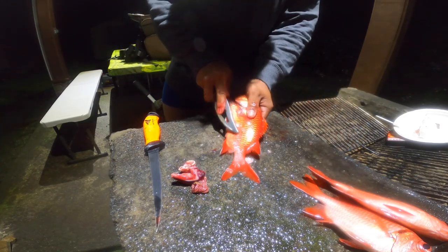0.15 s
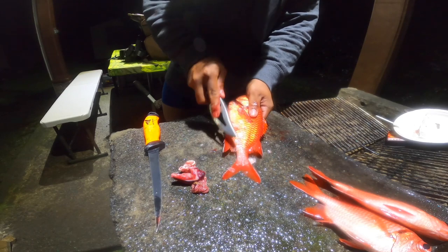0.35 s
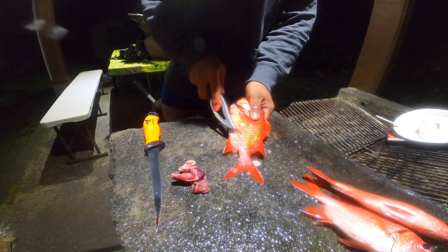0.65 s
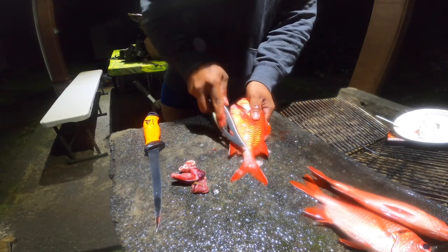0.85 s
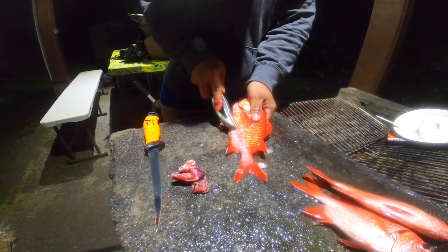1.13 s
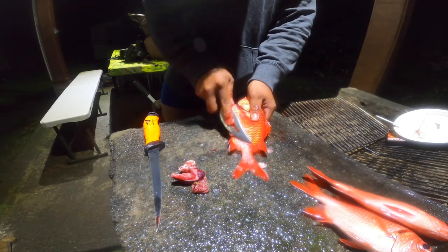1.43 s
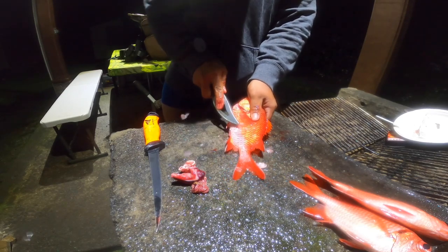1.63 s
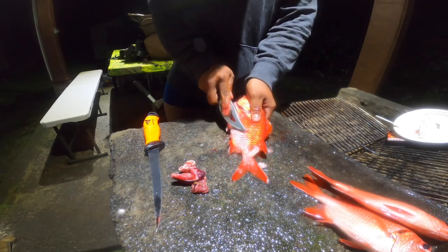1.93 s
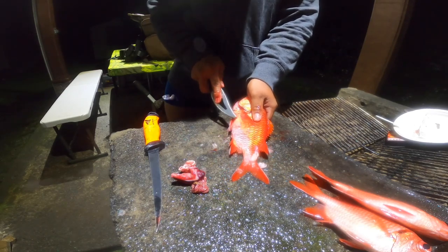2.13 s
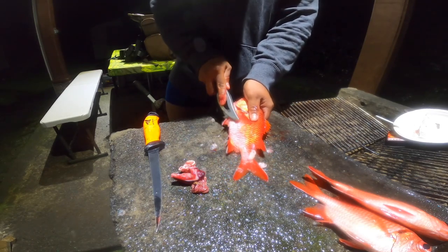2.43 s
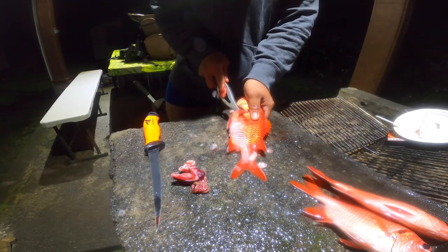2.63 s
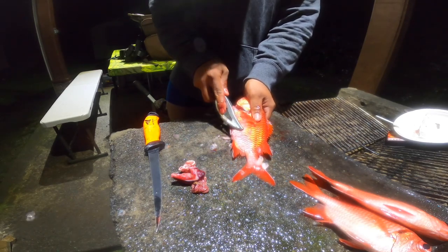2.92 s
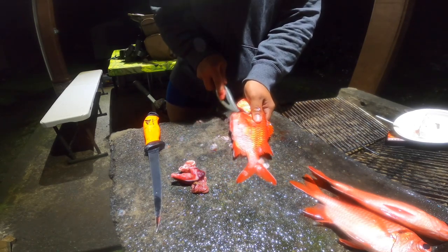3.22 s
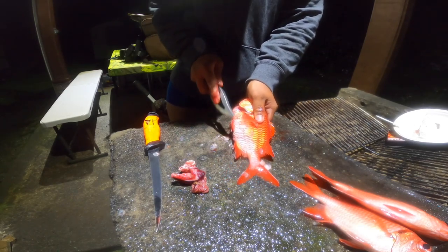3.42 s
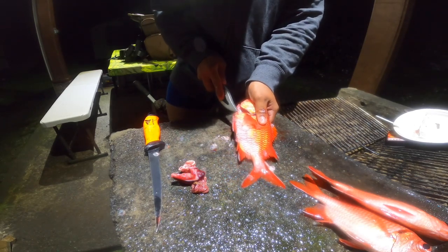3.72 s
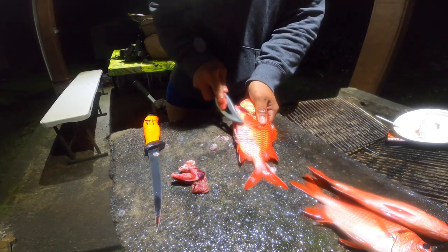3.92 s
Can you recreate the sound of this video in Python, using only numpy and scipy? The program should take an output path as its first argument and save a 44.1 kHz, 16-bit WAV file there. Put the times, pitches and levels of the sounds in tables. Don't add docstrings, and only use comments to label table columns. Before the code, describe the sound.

Close stereo sound of a fish being scaled on a stone slab under an open shelter at night. Rasping strokes come at about 0.15, 0.6, 1.1, 1.55, 2.0 and 2.5 seconds, each lasting about 0.15 to 0.2 seconds. Every stroke is a gritty scrape full of bright, sharp cracks, with the blade singing briefly around a high metallic pitch and a soft damped body beneath. Quick light drags follow at about 0.8 and 2.75. From 3.1 the strokes turn shorter and more broken, fading into light scrapes by 4.0. Loose scales tick between passes, and dull little knocks mark the edge bumping. Distant frogs give faint gliding whistles, clearer near 2.9, 3.4 and 3.8, over a soft insect and frog hiss. Low wind rumble stirs around 1.5 and swells most from 3.3 onward. The shelter adds only a very short, faint reflection.

```python
import sys
import numpy as np
from scipy import signal
from scipy.fft import rfft, irfft, next_fast_len
from scipy.io import wavfile
from scipy.ndimage import map_coordinates

SR = 44100
rng = np.random.default_rng(int(sys.argv[2]) if len(sys.argv) > 2 else 0)


def voltage_ratio(level):
    return 10 ** (np.asarray(level, float) / 20)


def inscribe(sig):
    pcm = np.round(np.clip(np.atleast_2d(sig).T, -1, 1) * 32767)
    wavfile.write(sys.argv[1], SR, pcm.astype(np.int16))


N = 179237

# start t/s, length t/s, rasp level/dB, blade level/dB at the start, at the end
STROKES = [(0.16, .15, -33.5, -33.5, -30), (0.61, 0.14, -29, -27, -32), (0.807, 0.011, -38, -46, -31),
           (1.074, 0.15, -31.5, -26, -34.5), (1.539, 0.16, -30.5, -23, -29), (1.758, 0.079, -48, -64, -54),
           (2.012, 0.2, -27.5, -27.5, -30.5), (2.473, 0.2, -30.5, -29, -42.5),
           (2.711, 0.061, -35, -33.5, -31.5), (2.789, 0.067, -45.5, -91, -42),
           (3.109, 0.1, -37, -36.5, -43), (3.272, 0.084, -34.5, -40, -34.5),
           (3.387, 0.064, -51.5, -54, -50), (3.673, 0.059, -37.5, -35.5, -33.5),
           (3.8, 0.045, -43.5, -43, -42.5), (4.026, 0.023, -47.5, -52, -50.5)]
LEAD_INS = [
    (.138, .02, -62, -53, -53),
    (.54, 0.052, -63, -73, -29),
    (1.0, 0.055, -51.5, -74, -44.5),
    (1.25, 0.088, -54.5, -69, -53),
    (2.412, 0.036, -47, -75, -48),
    (3.0, 0.067, -48, -63, -60),
    (3.59, 0.061, -51, -59, -49),
]


def knife():
    edge_db, first_db, last_db = np.transpose(STROKES + LEAD_INS)[2:]
    rasp_db = passes(edge_db - 4, edge_db, rise=0.031, fall=0.048, rest_db=-64)
    blade_db = passes(first_db, last_db, rise=0.027, fall=0.038, rest_db=-70.5)
    flesh_start_db = (edge_db + first_db) / 2 - 8 - 4.5
    flesh_end_db = (edge_db + last_db) / 2 - 8
    flesh_db = passes(flesh_start_db, flesh_end_db, rise=0.014, fall=0.049, rest_db=-72.5)
    major, minor = scales(rasp_db)
    cracks = snaps(major + TICKS + minor)
    scrape = knocks() + rasp(rasp_db) + blade(blade_db, major) + flesh(flesh_db)
    return cracks, scrape


def passes(start_db, end_db, rise, fall, rest_db):
    t, power = np.arange(N) / SR, voltage_ratio(2 * rest_db)
    for (s, length, *_), a, b in zip(STROKES + LEAD_INS, start_db, end_db):
        held = a + (b - a) * np.clip((t - s) / length, 0, 1)
        before, after = np.maximum(s - t, 0), np.maximum(t - s - length, 0)
        power = power + voltage_ratio(2 * (held - 20 * before / rise - 20 * after / fall))
    return 10 * np.log10(power)


def chatter(share, spread_db, row_db):
    slips = (rng.random(N) < share) * rng.standard_normal(N)
    slips = slips * voltage_ratio(spread_db * rng.standard_normal(N))
    return unit(slips * voltage_ratio(row_db * np.tanh(wobble(130))))


# f/Hz, bandwidth f/Hz, level/dB
EDGE = [(2270, 840, -9.5), (3400, 560, 3.5), (4250, 1180, 0.5), (5580, 860, 1.5), (9010, 800, -7.5),
        (11900, 2100, -20), (14800, 4800, -33)]


def rasp(level_db):
    slips = chatter(0.12, 4, 6.5) + 0.45 * rng.standard_normal(N)
    return voltage_ratio(level_db - 1.0) * unit(filtered(slips, modes(EDGE)))


# t/s, f/Hz
BEND = [(.2, 1840), (.68, 1830), (.82, 1880), (1.1, 1863), (1.25, 1875), (1.55, 1870), (2.0, 1859),
        (2.2, 1893), (2.5, 1873), (2.76, 1970), (3.1, 1906), (3.75, 1896), (3.85, 1920)]
# t/s, level/dB
CATCHES = [(.196, -16.5), (0.22, -15.5), (0.2283, -11.5), (0.264, -15.5), (0.6512, -13.5), (0.6611, -9.5),
           (0.6748, -9), (0.6922, -8.5), (.7075, -14), (0.7178, -13), (0.7349, -13), (1.1223, -14.5),
           (1.5249, -14), (1.536, -12), (1.5527, -13), (1.5582, -17), (1.5672, -9), (1.583, -18),
           (1.999, -15.5), (2.008, -11), (2.024, -16), (2.0308, -14), (2.1214, -15.5), (2.1747, -12.5),
           (2.206, -14.5), (3.2779, -14), (3.2979, -16.5), (3.3281, -16.5), (3.6937, -14.5), (3.764, -12.5),
           (.1526, -50), (.171, -30), (0.6102, -14), (1.0532, -25.5), (1.0714, -32), (1.9905, -24),
         (2.7402, -29), (2.7747, -34), (3.3756, -25), (3.4478, -25), (3.6725, -18.5), (3.7431, -20),
         (3.7888, -16), (3.7944, -19), (3.8338, -23)]


def blade(level_db, major):
    hz, = curves(BEND)
    first = voltage_ratio(level_db - 0.5) * unit(sing(chatter(0.1, 2.4, 7.5), hz, width_hz=353))
    second_db = level_db - 3 - 0.8 * np.maximum(hz - 1856, 0)
    second = voltage_ratio(second_db) * unit(sing(chatter(0.071, 5.5, 9.5), 1.9 * hz, width_hz=350))
    recoils = [(s - 0.00118, db - 12.5) for s, db, _ in major]
    s, db = np.transpose(CATCHES + recoils)
    kicks = np.zeros(N)
    np.add.at(kicks, np.round(s * SR).astype(int), voltage_ratio(db))
    return first + second + sing(kicks, hz, width_hz=243)


def sing(force, hz, width_hz):
    turn = np.exp(2j * np.pi * np.cumsum(hz) / SR)
    rate = np.pi * width_hz / SR
    swell = signal.lfilter([rate * np.e], np.poly([np.exp(-rate)] * 2), force / turn)
    return np.imag(turn * swell)


# f/Hz, bandwidth f/Hz, level/dB
FLESH = [(353, 390, -8), (916, 190, -4.5), (1258, 184, -4)]


def flesh(level_db):
    return voltage_ratio(level_db + 0.5) * unit(filtered(chatter(0.1, 3.7, 5.7), modes(FLESH)))


# t/s, level/dB
LARGE = [(.1531, -24), (.1778, -18), (.195, -17), (.202, -15), (.2255, -15.5), (.236, -25), (.2655, -15.5),
         (.2778, -27), (.2935, -19), (.3036, -24), (.6123, -34), (.6349, -14), (.6606, -15), (.728, -12.5),
         (.748, -15), (1.095, -17), (1.1251, -16), (1.1831, -20), (1.6298, -25), (1.6833, -16),
         (1.7145, -14), (2.0091, -32), (2.1475, -12), (2.1756, -13), (2.1928, -17), (2.5314, -12.5),
         (2.5896, -14), (3.2773, -9), (3.329, -15.5)]
# t/s, level/dB
MIDDLE = [(.2872, -18), (.3287, -14), (.6013, -14), (.689, -15), (.7068, -13), (.7362, -11),
          (1.1114, -13.5), (1.148, -16), (1.1558, -11.5), (1.1757, -12.5), (1.1909, -23), (1.2256, -10),
          (1.6234, -14.5), (1.645, -17), (1.6987, -13.5), (2.0231, -17), (2.0442, -19), (2.0616, -11),
          (2.0786, -22), (2.1212, -24), (2.1674, -17), (2.2195, -18.5), (2.537, -12.5), (2.561, -14),
          (2.616, -18), (2.6393, -25), (2.6561, -14.5), (2.6612, -11.5), (3.1738, -19), (3.1885, -9.5)]
# t/s, level/dB, f/Hz
VARIED = [(0.7699, -16.5, 8700), (0.81, -9.5, 9800), (1.0829, -14.5, 8600), (1.1622, -13, 5950),
          (1.5669, -15.5, 5200), (1.5784, -20, 4940), (1.5949, -15, 11800), (1.7286, -10.5, 9740),
          (2.0164, -17.5, 8640), (2.0323, -12.5, 5800), (2.085, -15.5, 9990), (2.1255, -10.5, 10340),
          (2.207, -20.5, 6150), (2.475, -12, 5190), (2.5246, -19, 8800), (2.6002, -16, 9550),
          (2.652, -17.5, 5840), (2.705, -9, 5860), (3.0964, -12.5, 9500), (3.231, -9, 5900),
          (3.2959, -18, 5800), (3.3077, -10, 8500), (3.6657, -21, 9500), (3.6745, -23, 5600),
          (3.6845, -24, 8550), (3.694, -12.5, 8500), (3.7285, -20, 8600), (3.744, -21, 9800),
          (3.764, -16.5, 9900), (3.7943, -18, 4300),
          (1.6145, -16, 8440), (1.658, -22, 4630), (2.074, -22, 4770), (2.1067, -22, 12200),
          (2.504, -23, 4000), (2.6994, -19.5, 4300), (3.1517, -26, 4000), (0.3438, -27, 4900),
          (.6395, -33, 8500), (0.7545, -20, 8600), (1.0893, -33, 8500), (1.1529, -19.5, 8400),
          (1.232, -24, 6000), (1.5344, -21.5, 3900), (1.5632, -26, 8950), (1.5871, -25, 9900),
          (1.9938, -32, 8550), (1.244, -31, 5750), (1.259, -36, 5800), (2.761, -36, 4500),
          (2.0403, -16.5, 8550), (2.1577, -23, 8000), (2.1715, -16.5, 8640), (2.4904, -33, 8500),
          (2.5482, -17, 8400), (2.665, -26, 8500), (2.6898, -27, 4500), (2.701, -25.5, 4600),
          (3.0928, -18.5, 9300), (3.1422, -23, 4500), (3.1853, -16.5, 8500), (3.2547, -28, 4500),
          (3.2982, -25, 9100), (3.6904, -16, 8500), (3.7001, -18, 8600), (3.7199, -29, 4600),
          (3.7335, -21, 9000), (3.7518, -29, 10000), (3.788, -19.5, 5370)]


def scales(rasp_db):
    sized = []
    for rows, hz in [(LARGE, 3560), (MIDDLE, 4190)]:
        sized += [(s, db, hz * (1 + 0.056 * rng.standard_normal())) for s, db in rows]
    gap_s = 0.03
    slots = np.arange(1, int(N / SR / gap_s) - 1)
    s = (slots + rng.random(len(slots))) * gap_s
    db = rasp_db[(s * SR).astype(int)] - 1 + 2 * rng.standard_normal(len(slots))
    hz = 4600 * np.exp(0.25 * rng.standard_normal(len(slots)))
    return sized + VARIED, list(zip(s, db, hz))


# t/s, level/dB, f/Hz
TICKS = [(.0845, -37, 5100), (0.419, -36, 5230), (0.5422, -23, 3680), (0.549, -29.5, 3970),
         (0.5563, -29, 5240), (0.9962, -33, 3920), (1.034, -37.5, 3560), (1.0553, -26.5, 4050),
         (1.301, -30.5, 3480), (1.34, -41, 5500), (1.83, -22.5, 5020), (1.926, -34.5, 4540),
         (2.422, -35.5, 3700), (2.461, -38, 5450), (2.8573, -28, 5000), (3.0384, -30, 3920),
         (3.086, -23, 4340), (3.1353, -29, 5400), (3.358, -33, 5170), (3.3752, -23.5, 4760),
         (3.4145, -28.5, 4800), (3.4491, -25.5, 3300), (3.4765, -32, 5700), (3.6062, -36, 5170),
         (3.8474, -32, 2660), (3.895, -22, 4270), (3.911, -34, 4850), (4.027, -41, 9200),
         (.088, -34, 4500), (.1476, -47, 8500), (.476, -43, 4020), (.504, -46, 4040), (0.8443, -43, 4500),
          (.876, -46, 4570), (1.0109, -44, 9400), (1.3183, -49, 8500), (1.347, -36.5, 8500),
          (1.824, -31.5, 4500), (1.9627, -40, 8500), (2.2542, -40, 6000), (2.426, -44, 8600),
          (2.7819, -42, 8500), (2.8116, -47, 8500), (2.8244, -31, 4360), (2.8921, -43.5, 4500),
          (3.049, -31.5, 5060), (3.5915, -47, 4500), (3.6571, -29, 9000), (3.8496, -34, 8600),
          (3.8581, -36, 6000), (4.0227, -50, 8500)]
# f/Hz, density level/dB per Hz
CRACK = [(180, -54), (300, -12), (737, -13.5), (1870, 4), (2740, -1), (3890, 4.5), (6520, -2), (10400, -3),
         (16000, -22)]
# f/Hz, level/dB
DULL = [(5000, 0.5), (8000, -3.5), (14000, -3.5)]


def snaps(rows):
    bright, dull, ring = np.zeros((3, N + SR))
    lead = 220
    t = (np.arange(SR // 40) - lead) / SR
    before, after = np.minimum(t, 0), np.maximum(t, 0)
    onset = 0.55 * voltage_ratio(60 * before / 0.013)
    decay = voltage_ratio(-60 * after / 0.0056) + 0.13 * voltage_ratio(-60 * after / 0.028)
    shape = np.where(t < 0, onset, decay)
    for s, db, hz in rows:
        i = round((s - 0.0002) * SR) - lead
        grit = rng.standard_normal(len(t))
        grit[lead] = 3.5
        small = np.log2(hz / 4500)
        crack_db = db + 9.1 * min(small, 0) - 3.0 * max(small, 0)
        crack = dull if hz < 5000 else bright
        crack[i:i + len(t)] += voltage_ratio(crack_db) * grit * shape
        ring[i:i + len(t)] += voltage_ratio(db - 60 * np.abs(t) * hz / 19) * np.sin(2 * np.pi * hz * t)
    crack = bright[:N] + filtered(dull[:N], lambda hz: voltage_ratio(along(DULL, hz)))
    f = np.fft.rfftfreq(1024, 1 / SR)
    fold = irfft(np.log(voltage_ratio(along(CRACK, f)) + 1e-4))
    fold[1:512] *= 2
    colour = irfft(np.exp(rfft(fold[:512], 1024)))
    crack = signal.fftconvolve(crack, colour / np.linalg.norm(colour))[:N]
    return voltage_ratio(-2.0) * crack + ring[:N]


# t/s, level/dB, f/Hz
KNOCKS = [(0.287, -25.5, 1120), (0.308, -26.5, 1110), (0.3281, -22.5, 1065), (.3285, -23.5, 1240),
          (0.6894, -27, 1340), (0.8084, -24.5, 1204), (1.124, -21, 1270), (1.6017, -29, 1296),
          (1.6187, -24.5, 1220), (2.1208, -18.5, 1163), (2.218, -21.5, 1080), (2.4742, -18, 1200),
          (2.537, -25.5, 1290), (2.5613, -24.5, 1300), (2.657, -26, 1320), (2.7474, -27.5, 397),
          (2.755, -31, 600), (2.765, -33, 330), (2.774, -28, 1284), (3.0977, -26, 1237),
          (3.23, -19.5, 1306), (3.2945, -31, 1240), (3.305, -28, 1440), (3.326, -30.5, 490),
          (0.675, -30, 1230), (1.094, -26.5, 1204), (1.238, -32, 1155), (1.299, -40, 1210),
         (2.4415, -41, 1180), (3.1514, -28, 1260), (3.276, -29, 1260), (3.3284, -26, 1240),
         (3.452, -40.5, 1300), (3.638, -41, 1210), (3.6752, -30.5, 1160), (3.694, -30, 1140),
         (3.7653, -31, 1190), (0.8122, -32.5, 399), (1.5276, -39, 453), (1.5399, -38, 450),
         (2.1296, -53, 450), (2.2209, -29.5, 427), (2.5925, -35, 500), (2.6158, -35, 507)]


def knocks():
    x, t = np.zeros(N + SR), np.arange(SR // 25) / SR
    bump = t / 0.0016 * np.exp(-t / 0.0012)
    ring = voltage_ratio(-19.5 - 60 * t / 0.039) * np.minimum(t / 0.0048, 1) * (1 - 25 * t)
    for s, db, hz in KNOCKS:
        x[round(s * SR):][:len(t)] += voltage_ratio(db + 12.5) * (bump + ring) * np.sin(2 * np.pi * hz * t)
    return x[:N]


# f/Hz, left-right level/dB
LEAN = [(300, -0.5), (1500, -0.5), (3500, 1), (6000, -1), (9000, -9.5), (14000, -11)]


def ports(cracks, scrape):
    drift = np.array([wobble(1500), wobble(1500)])
    scatter_db = [(2500, -17.5), (5000, -5.5), (13000, 7.0)]
    scatter = filtered((scrape + voltage_ratio(-9) * cracks) * drift, lambda hz: voltage_ratio(along(scatter_db, hz)))
    side = np.array([[0.5], [-0.5]])
    lag_s = 1.5 / SR
    return filtered(cracks + scrape + scatter,
                    lambda hz: voltage_ratio(side * along(LEAN, hz)) * np.exp(-2j * np.pi * hz * side * lag_s))


# f/Hz, reverberation time t60/s
SHELTER = [(300, 0.14), (3000, 0.13), (12000, 0.093)]


def shelter(dry):
    colour = [(700, -7.5), (2000, -7.5), (6000, -9.0)]
    return filtered(echo(dry, SHELTER, 0.0006), lambda hz: voltage_ratio(along(colour, hz)))


# t/s, length t/s, from f/Hz, to f/Hz, level/dB
FROGS = [(0.046, 0.24, 1497, 1448, -53.5), (0.35, 0.14, 2200, 2900, -56), (0, .05, 2640, 2620, -66),
         (0.91, 0.083, 2640, 2560, -66), (1.36, 0.17, 1445, 1484, -65), (1.36, 0.17, 2500, 2840, -62),
         (1.75, 0.07, 2700, 2840, -57), (1.808, 0.135, 2840, 2690, -57), (2.868, 0.16, 1527, 1446, -50.5),
         (3.39, 0.12, 2800, 3000, -52.5), (3.48, 0.12, 1580, 1540, -66), (3.771, 0.17, 2390, 2790, -47),
         (3.92, 0.075, 2640, 2755, -54), (3.94, 0.12, 1485, 1490, -70)]


def frogs():
    x = np.zeros(N + SR)
    waver = np.pad(0.016 * wobble(70), (0, SR))
    blur = np.pad(unit(wobble(260)), (0, SR))
    for s, length, from_hz, to_hz, db in FROGS:
        i, count = round(s * SR), round(1.3 * length * SR)
        u = np.arange(count) / (1.3 * length * SR)
        height = to_hz / 3000
        hz = to_hz + (from_hz - to_hz) * np.maximum(1 - 1.3 * u, 0) ** 1.3
        hz *= 1 + waver[i:][:count] * height ** 2
        swell = np.minimum(u / (0.27 * height ** 2), 1) * np.minimum((1 - u) / 0.38, 1)
        swell *= voltage_ratio(db + 9.5 - 20 * u ** 1.4)
        share = 0.85 * height ** 4
        swell *= 1 - share + share * blur[i:][:count]
        x[i:][:count] += swell * np.sin(2 * np.pi * np.cumsum(hz) / SR)
    x = x[:N] * voltage_ratio(0.8 * wobble(44.73))
    trees = voltage_ratio(-3) * echo(x, [(1000, 0.3), (3000, 0.25)], 0.012)
    return x * voltage_ratio([[1.5], [-1.5]]) + trees


# f/Hz, density level/dB per Hz
DEEP = [(12, -30), (20, 5.5), (70, 0), (110, -6), (140, -65), (240, -120)]
# f/Hz, density level/dB per Hz
BODY = [(47, -36), (80, -10), (139, 0), (193, 0), (285, -7), (700, -41), (910, -67), (1540, -120)]
# f/Hz, density level/dB per Hz
FLUTTER = [(200, -37), (330, -1.5), (620, -16.5), (1000, -50)]


def rumble():
    deep_gain, body_gain = gusts()
    deep = deep_gain * voltage_ratio(3.2 * wobble(7.57)) * rush(DEEP, [(25, 0.96), (75, 0.72)])
    lumps_db = 1.8 * wobble(12)
    body = body_gain * voltage_ratio(lumps_db) * rush(BODY, [(100, 0.89), (400, 0.97)])
    flutter = body_gain ** 2 * voltage_ratio(21.5 + 2 * lumps_db) * rush(FLUTTER, [(300, 0.92)])
    return deep + body + flutter


# peak t/s, rise t/s, fall t/s, deep level/dB, body level/dB
GUSTS = [(1.44, 0.11, 0.13, -36, -74), (1.58, 0.094, 0.14, -62, -38.5), (1.73, 0.17, 0.43, -42, -52),
         (3.27, 0.018, 0.37, -37, -31), (3.375, 0.11, 0.26, -31.5, -33.5), (3.8, 1, 0.41, -36.5, -39.5),
         (3.5, 0.12, .15, -49, -40.5), (3.66, 0.1, 0.21, -45, -41), (3.93, 0.073, 0.17, -48, -47),
         (.15, 0.13, 0.073, -43.5, -53), (.9, .1, 0.082, -51, -56), (2.45, 0.066, 0.15, -45, -60)]


def gusts():
    t, gain = np.arange(N) / SR, voltage_ratio(np.array([[-50.5], [-53]]))
    for s, rise, fall, *db in GUSTS:
        slope = 20 * np.maximum((s - t) / rise, (t - s) / fall)
        gain = np.hypot(gain, voltage_ratio(np.array(db)[:, None] - slope))
    return gain


# f/Hz, density level/dB per Hz
NIGHT = [(210, -22), (350, -2), (522, -13), (603, -6), (857, -18), (1410, -1), (2130, -9), (2460, 1.5),
         (3280, -12.5), (6850, -21), (8040, -25), (10200, -33), (16000, -35)]
# f/Hz, left-right correlation
ALIKE = [(60, 0.85), (240, 0.28), (950, 0.48), (3770, 0.12), (15000, 0.09)]


def night():
    return voltage_ratio(-58 + 1.2 * wobble(1.9)) * rush(NIGHT, ALIKE)


def rush(spectrum, alike):
    def turn(hz):
        return np.arccos(np.clip(along(alike, hz), -1, 1)) / 2
    pair = rng.standard_normal((2, N))
    mid, side = filtered(pair, lambda hz: voltage_ratio(along(spectrum, hz)) * [np.cos(turn(hz)), np.sin(turn(hz))])
    return unit(np.array([mid + side, mid - side]))


def echo(x, t60s, wait):
    hz, t, z = signal.stft(rng.standard_normal((2, SR // 3)), SR, nperseg=128)
    fade = voltage_ratio(-60 * t / along(t60s, hz)[:, None])
    tail = signal.istft(z * fade, SR, nperseg=128)[1]
    late = np.pad(x, (round(wait * SR), 0))[None]
    return signal.fftconvolve(late, tail / np.linalg.norm(tail[0]), axes=1)[:, :N]


def modes(table):
    def response(f):
        return sum((-1) ** k * voltage_ratio(db) * 1j * f * w / (c * c - f * f + 1j * f * w)
                   for k, (c, w, db) in enumerate(table))
    return response


def filtered(x, response):
    m = next_fast_len(N + SR // 2)
    return irfft(rfft(x, m) * response(np.fft.rfftfreq(m, 1 / SR)), m)[..., :N]


def wobble(rate):
    knots = rng.standard_normal(int(N * rate / SR) + 4)
    return map_coordinates(knots, [np.arange(N) * rate / SR])


def curves(rows):
    s, *cols = np.transpose(rows)
    return [np.interp(np.arange(N) / SR, s, c) for c in cols]


def along(points, hz):
    f, v = np.transpose(points)
    return np.interp(np.log(hz + 1), np.log(f + 1), v)


def unit(x):
    return x / np.sqrt(np.mean(x ** 2) + 1e-20)


def scene():
    cracks, scrape = knife()
    return ports(cracks, scrape) + shelter(cracks + scrape) + frogs() + rumble() + night()


def low_pass(x):
    return signal.sosfilt(signal.butter(12, 16640, fs=SR, output="sos"), x)


# f/Hz, level/dB
TOP = [(13000, -0.5), (15600, -7), (16300, -21), (17000, -56)]


def record(dry):
    rounded = dry / (1 + np.abs(dry / 0.78) ** 4) ** 0.25
    mix = filtered(rounded, lambda hz: voltage_ratio(along(TOP, hz)))
    return low_pass(mix)


dry = scene()
out = record(dry)
inscribe(out)
```